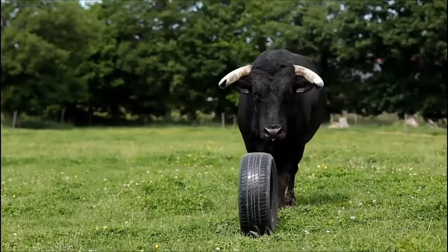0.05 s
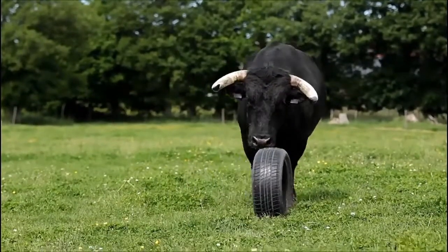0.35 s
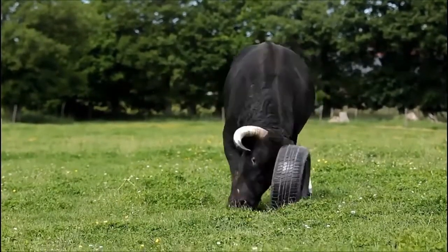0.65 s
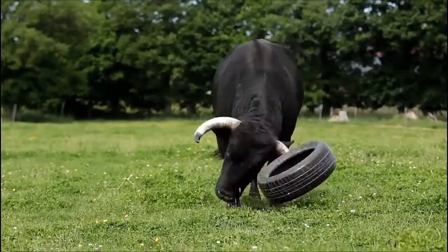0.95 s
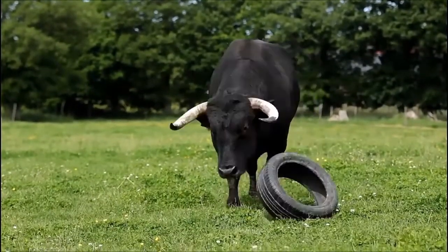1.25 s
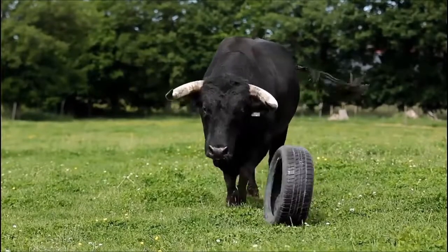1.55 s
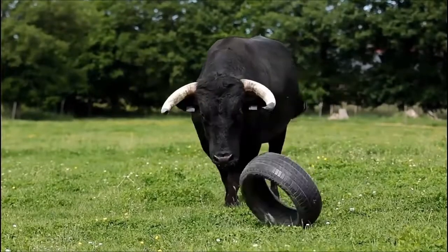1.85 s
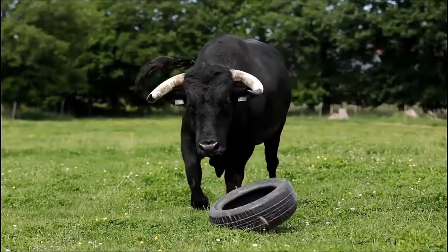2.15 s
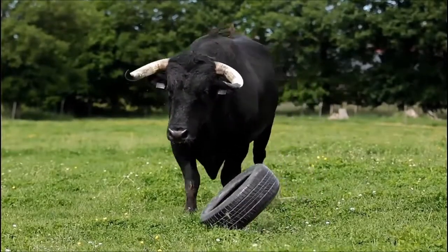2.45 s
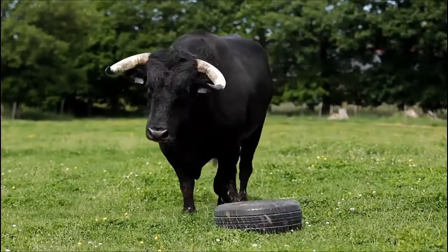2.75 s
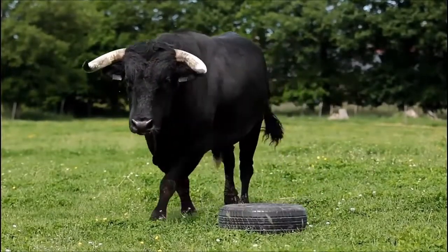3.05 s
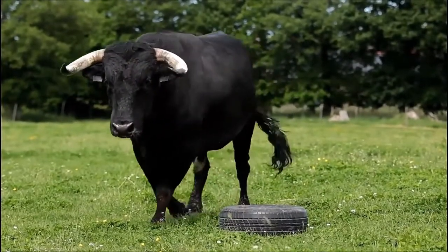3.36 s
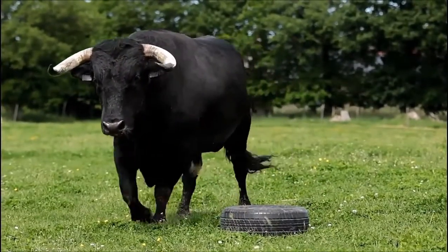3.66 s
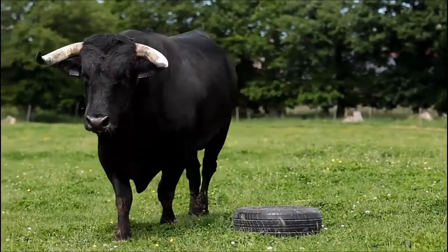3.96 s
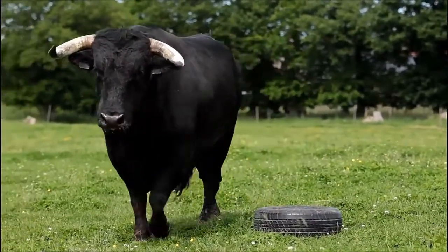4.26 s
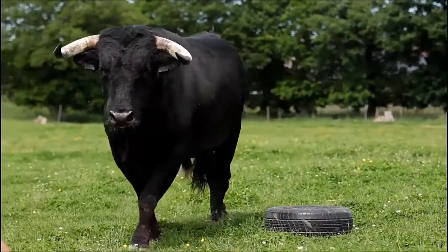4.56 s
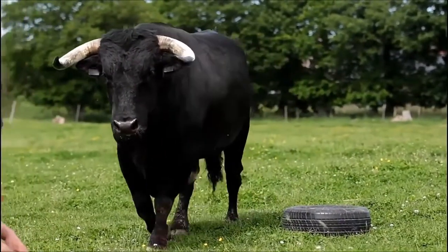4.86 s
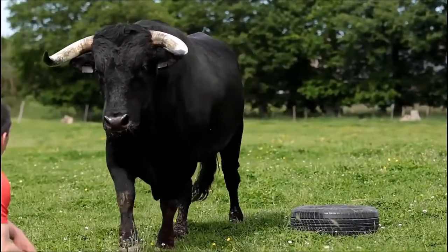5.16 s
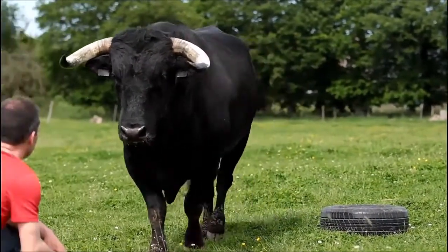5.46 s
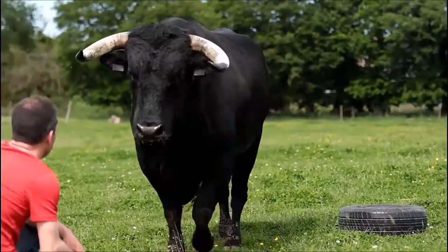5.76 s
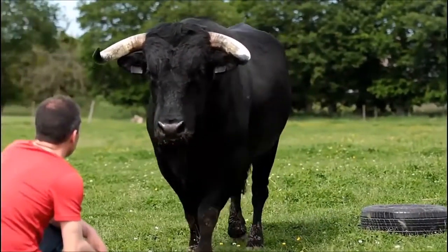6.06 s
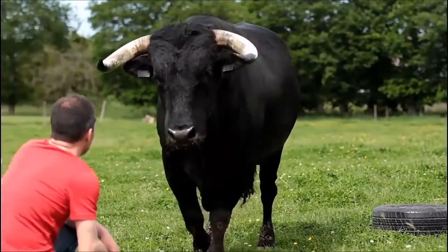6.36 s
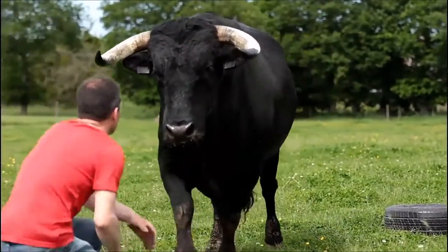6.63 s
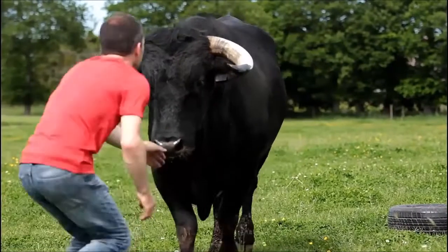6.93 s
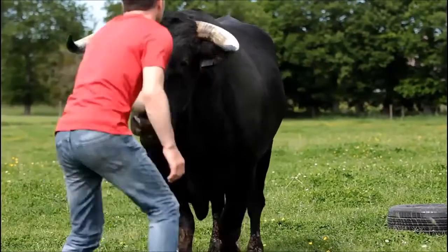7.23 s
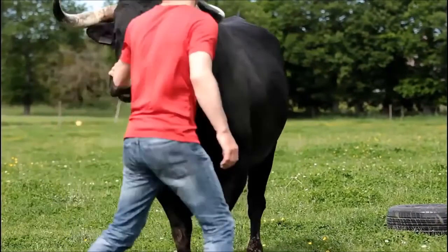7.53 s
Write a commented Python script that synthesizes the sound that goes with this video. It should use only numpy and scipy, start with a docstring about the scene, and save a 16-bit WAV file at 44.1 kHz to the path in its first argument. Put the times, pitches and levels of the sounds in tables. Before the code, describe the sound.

A deep wind gust hits the microphone and fades, then a sparrow chirps over a light breeze and dull thumps from a tyre and hooves.

```python
"""In a meadow, a bull shoves a tyre about, then walks up through the grass.
Tyre, hooves and late footsteps thump, a horn scrapes the rubber, and blades swish past his legs.
A hard gust hits the microphone with a deep throb and dies away; a light breeze keeps buffeting it
and freshens in dull puffs at the end. A sparrow repeats its hoarse chirp, and songbirds whistle from
the rustling tree line, where leaves and trunks blur their calls."""
import sys
import numpy as np
from scipy import signal
from scipy.fft import rfft, irfft, next_fast_len
from scipy.io import wavfile
from scipy.ndimage import uniform_filter1d

SR = 44100
rng = np.random.default_rng(int(sys.argv[2]) if len(sys.argv) > 2 else 0)


def put_to_file(sound):
    """Save the sound as 16-bit audio at rate SR, in the file named by the first command-line argument."""
    columns = np.atleast_2d(sound).T  # one column per channel
    safe = np.clip(columns, -1, 1)
    whole_steps = np.round(safe * 32767)
    wavfile.write(sys.argv[1], SR, whole_steps.astype(np.int16))


N = 334719
T = np.arange(N) / SR
PORT_LAG_S = .000095  # sound from the right reaches the microphone's left opening (port) this much later

# How wide breeze and thumps sound. Each row: frequency in Hz, width in dB (side minus middle).
LOW_NOISE_WIDTH = [(60, -1), (120, -2.5), (280, 4), (450, 0), (700, -2), (1300, -10)]
# How much the wind flutters. Each row: frequency in Hz, share of the full flutter.
FLUTTER_SHARE = [(300, 1), (700, .7), (1300, .3)]


def undb(db):
    """Turn decibels into a factor to multiply by."""
    return 10 ** (np.asarray(db) / 20)


def unit(x):
    """Scale a signal to an average (rms) size of 1."""
    return x / np.sqrt(np.mean(x ** 2))


def curve(rows):
    """Join (seconds, value) points with straight lines, one value per sample."""
    return np.interp(T, *np.transpose(rows))


def at(points, hz):
    """Read between (Hz, value) points, with every octave equally wide."""
    points = np.array(points)
    return np.interp(np.log(np.maximum(hz, 1)), np.log(points[:, 0]), points[:, 1])


def bump(peak_s, half_length_s):
    """A smooth, bell-shaped rise to 1 and back."""
    return np.exp(-.5 * ((T - peak_s) / half_length_s) ** 2)


def wander(rate):
    """A smooth random wobble of size 1 that heads for a new value `rate` times a second."""
    hold = int(SR / rate)
    steps = np.repeat(rng.standard_normal(N // hold + 1), hold)
    return unit(uniform_filter1d(uniform_filter1d(steps, hold), hold)[:N])


def noise(colour, width=((1000, 0),)):
    """Stereo noise: colour sets how strong each frequency is, width how unlike the two sides are."""
    size = next_fast_len(N)
    hz = np.arange(size // 2 + 1) * SR / size
    mid, side = rfft(rng.standard_normal((2, size)))
    side = side * undb(at(width, hz))
    spectrum = np.array([mid + side, mid - side]) * undb(at(colour, hz))
    return unit(irfft(spectrum, size)[:, :N])


def octaves(x):
    """Split x into overlapping octave bands, each given as (centre in Hz, band)."""
    size = next_fast_len(N)
    hz, spectrum = np.arange(size // 2 + 1) * SR / size, rfft(x, size)
    centres = 40 * 2 ** np.arange(9)
    for centre, weights in zip(centres, np.eye(len(centres))):
        yield centre, irfft(spectrum * at(np.c_[centres, weights], hz), size)[:, :N]


def add(out, start_s, x):
    """Mix x into out at the given time."""
    i = max(int(start_s * SR), 0)
    out[..., i:i + x.shape[-1]] += x[..., :N - i]


def piece(x, start_s, samples):
    """Take a stretch of x, wrapping round at its end."""
    return np.roll(x, -int(start_s * SR), axis=-1)[..., :samples]


def tone(hz):
    """A pure tone that follows a changing pitch."""
    return np.sin(2 * np.pi * np.cumsum(hz) / SR)


def leaves(rustle_db=-49, hiss_db=-52, ease_from_s=4.44, ease_db_per_s=1.08):
    """Distant leaves flicker band by band under an even hiss; both ease off towards the end."""
    # The tone of leaves and hiss. Each row: frequency in Hz, relative level in dB.
    colour = [(470, -10), (800, -3.5), (1090, -7.5), (1550, -5), (2750, -3.5), (2970, -5), (3200, -2),
              (4590, -0.5), (6120, -6), (7660, -5), (8260, -7), (15000, -5), (15800, -2.5)]
    # Their stereo spread. Each row: frequency in Hz, width in dB.
    width = [(1300, -2.5), (2400, -1), (4200, 2), (6500, -0.5), (9000, -2), (15000, 0)]
    out, flicker_db = 0, 1.0
    for hz, band in octaves(noise(colour, width)):
        leafy = hz < SR / 6
        out = out + band * undb(rustle_db + flicker_db * wander(9.1) if leafy else hiss_db)
    return out * undb(-ease_db_per_s * np.maximum(T - ease_from_s, 0))


def tree_line(direct, scattered, tail_s, left_db, lag_s):
    """Place a bird to the right; nearby leaves blur its call and farther trunks give it a tail."""
    t, near_s, near_db = T[:SR // 2], .016, 11
    tail = rng.standard_normal((2, len(t))) * undb(-60 * t / tail_s + near_db * np.exp(-t / near_s))
    tail /= np.sqrt(np.sum(tail ** 2, axis=1, keepdims=True))
    ports = np.array([np.roll(direct, round(lag_s * SR)), direct])
    blur = signal.fftconvolve(scattered[None], tail, axes=1)[:, :N]
    return (ports + blur) * np.array([[undb(left_db)], [1]])


def far_notes(count=14, low_hz=2900, high_hz=5600, length_s=.074, glide=.095, level_db=-61):
    """Rows for whistles(): faint notes from deeper in the trees, at chance times and pitches."""
    rows = []
    for when, duration, height, slope in rng.random((count, 4)):
        start_hz = low_hz * (high_hz / low_hz) ** height
        end_hz = start_hz * (1 + glide * (2 * slope - 1))
        rows.append((when * T[-1], length_s * (.5 + duration), start_hz, end_hz, level_db))
    return rows


def whistles(rows, waver, fading_db):
    """Quivering notes that slide from one pitch to another and fade in and out."""
    out, quiver = np.zeros(N), 1 + waver * wander(400)
    for start, length, start_hz, end_hz, db in rows:
        progress = np.linspace(0, 1, int(length * SR))
        pitch = (start_hz + (end_hz - start_hz) * progress) * piece(quiver, start, len(progress))
        arch = np.sqrt(4 * progress * (1 - progress))
        add(out, start, undb(db) * arch * tone(pitch))
    return out * undb(fading_db * wander(40))


def songbirds():
    """Far song on the moving air: mellow whistles well to the right, thin buzzy ones more central."""
    # Mellow notes. Each row: start and length in seconds, first and last pitch in Hz, level in dB.
    mellow_notes = [(1.01, .09, 2150, 2260, -54), (1.31, .11, 2250, 2400, -52), (2.49, .1, 2260, 2240, -54),
                    (3.875, .065, 2050, 2130, -55), (4.048, .06, 2440, 2030, -50),
                    (4.567, .1, 2330, 1720, -52.5), (4.825, .22, 1950, 1910, -57.5),
                    (5.125, .11, 2210, 2220, -55.5), (5.22, .09, 2240, 2400, -55)]
    # Thin, high notes, with the same columns.
    thin_notes = [(1.03, .14, 4850, 5150, -52), (1.19, .17, 5000, 5500, -52), (1.59, .075, 6020, 6250, -47),
                  (1.68, .2, 6450, 6750, -55.5), (1.86, .26, 6750, 6550, -59), (2.19, .14, 5750, 5600, -56),
                  (4.11, .23, 5450, 5400, -48)]
    mellow = whistles(mellow_notes, waver=.016, fading_db=1.8)
    thin = whistles(thin_notes + far_notes(), waver=.026, fading_db=1.6)
    return (tree_line(mellow, mellow * undb(-6), tail_s=.5, left_db=-10, lag_s=0)
            + tree_line(thin, thin * undb(-6), tail_s=.6, left_db=-2, lag_s=PORT_LAG_S))


def sparrow(trill_hz=135, trill_depth=.065, trill_from_s=.0407, echo_s=.033, echo_db=-16, uneven_db=-1):
    """A hoarse chirp sweeps up, drops, rises and sinks in a fast trill; the ground returns one echo."""
    # One chirp. Each row: seconds from its accent, pitch in Hz, relative level in dB.
    shape = [(-.025, 3400, -18), (-.02, 4000, -9), (-.013, 4950, -12), (-.001, 5050, -10), (.003, 4050, -1),
             (.014, 3900, 3), (.018, 3400, -10), (.026, 3680, 2), (.035, 4200, 0), (.04, 3650, -2.5),
             (.055, 3380, -9), (.072, 3100, -20)]
    # The calls. Each row: time of the accent in seconds, level in dB, relative level of the
    # scattered sound in dB, boost of the opening upsweep in dB.
    calls = [(.86, -39, -5, 2), (1.07, -52, -4, 6), (1.372, -39, -8, 6), (2.04, -53, -4, 6),
             (2.223, -37.5, -6, 5), (3.111, -35.5, -8, 6), (3.564, -46.5, -5, 8), (4.179, -35, -6, 3.5),
             (5.112, -40.5, -5, 2), (5.468, -49.5, -6, 10), (5.736, -37.5, -7, 3), (6.862, -43, -6, 5),
             (6.982, -49, -6, 7), (7.27, -54, -2, 0), (7.551, -42, -6, 6)]
    shape_s, shape_hz, shape_db = np.transpose(shape)
    direct, scattered = np.zeros(N), np.zeros(N)
    pitch_spread, pace_spread, rasp = .018, .06, .026
    quiver = 1 + rasp * wander(900)
    chances = rng.standard_normal((len(calls), 3, len(shape)))  # no two chirps are quite alike
    for (accent_s, level_db, scatter_db, upsweep_db), (bend, stress, stretch) in zip(calls, chances):
        turns_s = shape_s * np.exp(pace_spread * stretch[0])
        turns_hz = shape_hz * (1 + pitch_spread * bend)
        turns_db = shape_db + upsweep_db * (shape_s < 0) + uneven_db * stress
        t = np.arange(turns_s[0], turns_s[-1], 1 / SR)
        trill = 1 + trill_depth * np.sin(2 * np.pi * trill_hz * t) * (t > trill_from_s)
        pitch = np.interp(t, turns_s, turns_hz) * trill * piece(quiver, accent_s, len(t))
        chirp = undb(level_db + np.interp(t, turns_s, turns_db)) * tone(pitch)
        start = accent_s + t[0]
        add(direct, start, chirp)
        add(direct, start + echo_s, chirp * undb(echo_db))
        add(scattered, start, chirp * undb(scatter_db))
    return tree_line(direct, scattered, tail_s=.55, left_db=-2, lag_s=PORT_LAG_S)


def breeze(gain_db=3, usual_db=-47, flutter_db=2, eddy_db=1.2):
    """Soft buffeting: swirls of air shake all bands, each flutters alone, and dull puffs stand out."""
    # The breeze's rise and fall. Each row: time in seconds, strength in dB.
    strengths = [(1.8, -54.5), (2.1, -49), (2.4, -51), (3.18, -46), (3.35, -51), (3.65, -51), (3.9, -50.5),
                 (4.07, -49), (4.19, -49), (4.29, -45), (4.37, -50.5), (4.5, -46), (4.63, -49.5),
                 (4.95, -49), (5.15, -47.5), (5.35, -48), (5.75, -51), (5.95, -50), (6.25, -53),
                 (6.88, -45.5), (7.15, -42), (7.26, -43.5), (7.33, -42), (7.5, -39.5), (7.59, -44)]
    # Its tone. Each row: frequency in Hz, relative level in dB.
    colour = [(20, -17), (45, -7.5), (75, -2), (110, 4), (170, -1), (300, -.5), (430, -4.5), (520, -9.5),
              (680, -13), (900, -28.5), (1350, -31), (2200, -44), (6000, -55)]
    # Puffs as it freshens. Each row: peak time and half length in seconds, rise in dB.
    puffs = [(7.105, 0.044, 2), (7.205, 0.014, 2), (7.3, 0.011, 1), (7.51, 0.025, 3.5)]
    # Where a puff is heard. Each row: frequency in Hz, factor on its rise.
    puff_depth = [(150, 1), (500, 1.1), (800, .8), (1300, .2)]
    # Stronger buffets are deeper. Each row: frequency in Hz, dB gained per dB of strength.
    growth = [(60, 1.7), (130, 1.5), (350, .89), (700, .97), (1300, 2.3)]
    strength_db = curve(strengths)
    puff_db = sum(db * bump(peak_s, half_s) for peak_s, half_s, db in puffs)
    air = 0
    for hz, band in octaves(noise(colour, LOW_NOISE_WIDTH)):
        swell_db = at(growth, hz) * (strength_db + at(puff_depth, hz) * puff_db - usual_db)
        air = air + band * undb(swell_db + flutter_db * at(FLUTTER_SHARE, hz) * wander(25))
    return air * undb(usual_db + gain_db + eddy_db * wander(30))


def gust(gain_db=8.5, fall_db_per_s=31, flutter_db=1.5):
    """Air churns at the microphone's openings, growing duller as it weakens and ebbs away."""
    # The gust's rise and fall. Each row: time in seconds, strength in dB.
    strengths = [(0.0, -34.5), (.025, -32.5), (0.065, -36), (0.11, -31.5), (0.158, -33), (0.205, -30),
                 (0.27, -35), (0.55, -42.5), (0.8, -49.5)]
    # Its tone at its height. Each row: frequency in Hz, relative level in dB.
    colour = [(14, -26), (24, 1), (33, -4), (75, 2.5), (110, 0), (200, -1.5), (300, -4), (400, -6.5),
              (600, -5), (720, -9), (920, -16), (4000, -17.5), (5150, -21.5), (5700, -26), (14000, -44)]
    # Small swirls die first. Each row: frequency in Hz, dB lost per dB of strength lost.
    growth = [(40, .55), (90, .55), (200, .65), (600, .75), (3000, 1.05), (5500, 1.45), (9000, 1.9)]
    # Its stereo spread. Each row: frequency in Hz, width in dB.
    width = [(40, -8), (90, -5), (200, -3), (500, -1), (3000, 0)]
    strength_db = curve(strengths) - fall_db_per_s * np.maximum(T - strengths[-1][0], 0)
    peak_db = strength_db.max()
    air = 0
    for hz, band in octaves(noise(colour, width)):
        ebb_db = at(growth, hz) * (strength_db - peak_db)
        air = air + band * undb(ebb_db + flutter_db * at(FLUTTER_SHARE, hz) * wander(30.8))
    return air * undb(peak_db + gain_db)


def thrum(hz=41.5, level_db=-35.7, rise_s=.14, hold_s=1.07, sag_db_per_s=3.5, fall_db_per_s=26):
    """A deep, throbbing tone rises with the gust, sags slowly and outlasts it."""
    waver, throb, stray_rad = .051, .45, .45
    phase = 2 * np.pi * np.cumsum(hz * (1 + waver * wander(7.2))) / SR
    ports = np.sin(phase + stray_rad * np.array([wander(26.2), wander(17.2)]))  # slightly out of step
    fade_db = sag_db_per_s * T + fall_db_per_s * np.maximum(T - hold_s, 0)
    loudness = np.minimum(T / rise_s, 1) * undb(level_db - fade_db)
    return unit(ports * (1 + throb * wander(21.65))) * loudness


def grass(grain_db=3):
    """Blades brush past the bull's legs in short, grainy swells."""
    # The swishes. Each row: peak time in seconds, level in dB, half length in seconds.
    swishes = [(1.24, -57, 0.033), (1.575, -56, 0.028), (3.03, -51.5, 0.032), (3.723, -55, 0.027),
               (4.793, -55.5, 0.048), (5.91, -58, .022), (6.67, -54, 0.044), (7.53, -56.5, 0.03)]
    # Their tone. Each row: frequency in Hz, relative level in dB.
    colour = [(1200, -14), (3000, -3.5), (4200, -0.5), (5800, -7), (7300, -1.5), (10000, -17), (15000, -21)]
    swell = sum(undb(db) * bump(peak_s, half_s) for peak_s, db, half_s in swishes)
    return noise(colour) * swell * undb(grain_db * wander(250))


def horn_scrape(peak_s=.847, half_length_s=.014, level_db=-40, dull_hz=4900):
    """The horn skids briefly over the tread; soft rubber takes away the treble."""
    # How horn on rubber rings. Each row: pitch in Hz, bandwidth in Hz, relative level in dB.
    rings = [(1410, 55, 2.5), (1830, 300, -8), (2500, 990, -8), (3980, 370, -8.5), (4670, 260, -8)]
    slips = rng.standard_normal((2, N))
    ring = sum(undb(db) * signal.lfilter(*signal.iirpeak(hz, hz / width, fs=SR), slips)
               for hz, width, db in rings)
    dulled = signal.sosfilt(signal.butter(8, dull_hz, fs=SR, output="sos"), ring)
    return unit(dulled) * undb(level_db) * bump(peak_s, half_length_s)


def thumps(crunch_s=.1, fade_swings=12):
    """Dull low thumps: tyre, hooves, and near the end footsteps and puffs of wind."""
    # The thumps. Each row: start in seconds, level in dB, pitch in Hz, rise time in seconds,
    # relative level of the crunch in dB.
    events = [(2.7745, -17.5, 222, 0.0048, -24), (3.782, -35.5, 260, 0.0048, 1),
              (3.828, -35, 190, 0.0046, -4), (4.461, -36, 106, 0.0091, -10), (4.512, -30, 106, 0.01, -19),
              (4.713, -26.5, 196, .012, -2.5), (5.154, -36, 183, 0.0068, -3),
              (6.671, -35, 170, 0.0055, -10), (7.022, -29.5, 115, .004, -2), (7.07, -28, 290, .005, -3),
              (7.214, -28.5, 250, .006, -2), (7.315, -32, 100, .008, -6), (7.398, -30.5, 130, .006, -2),
              (7.478, -25.5, 120, .008, -10), (7.51, -27.5, 170, .004, -2)]
    # The dull crunch, as of turf giving way. Each row: frequency in Hz, relative level in dB.
    colour = [(60, -9), (130, -5), (320, -2), (450, -8.5), (800, -19.5), (2000, -54)]
    out, t = np.zeros((2, N)), T[:SR // 4]
    dull_noise = noise(colour, LOW_NOISE_WIDTH)
    for start, db, hz, rise_s, crunch_db in events:
        push = 1 - np.exp(-(t / rise_s) ** 2)
        swings = undb(-60 * t * hz / fade_swings) * np.sin(2 * np.pi * hz * t)
        crunch = undb(crunch_db - 60 * t / crunch_s) * piece(dull_noise, start, len(t))
        add(out, start, undb(db) * push * (swings + crunch))
    return out


def scene():
    """Wind, trees, birds, thumps and bull together."""
    wind = gust() + thrum() + breeze()
    trees = leaves() + sparrow() + songbirds()
    return wind + trees + thumps() + grass() + horn_scrape()


def record(dry, top_hz=15800):
    """The camera cuts off the highest treble."""
    return signal.sosfilt(signal.ellip(12, .1, 80, top_hz, fs=SR, output="sos"), dry)


dry = scene()
out = record(dry)
put_to_file(out)
```